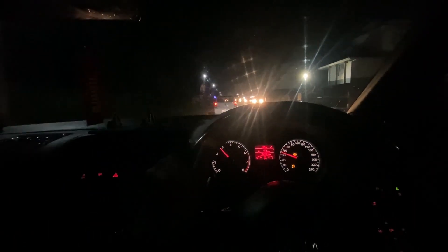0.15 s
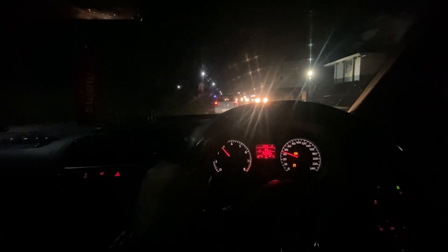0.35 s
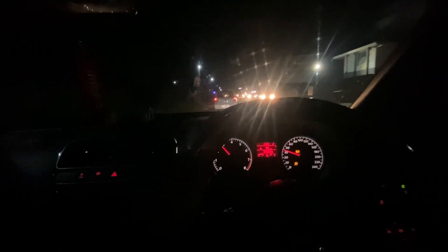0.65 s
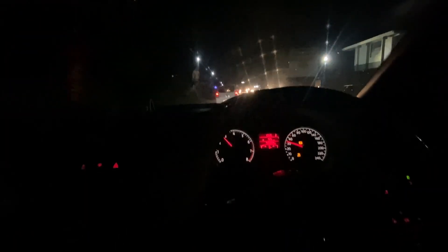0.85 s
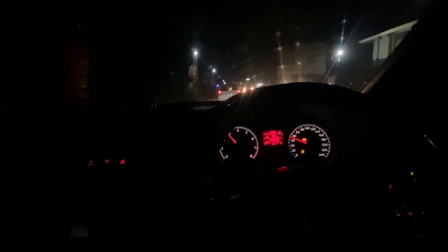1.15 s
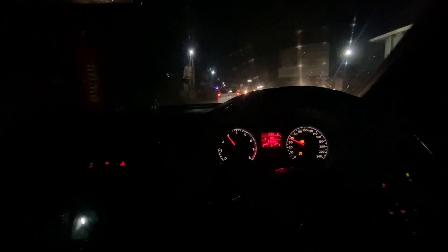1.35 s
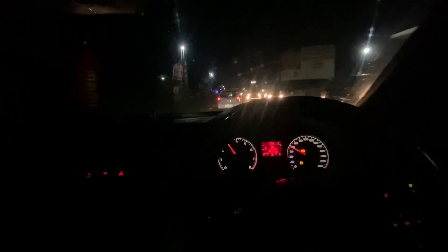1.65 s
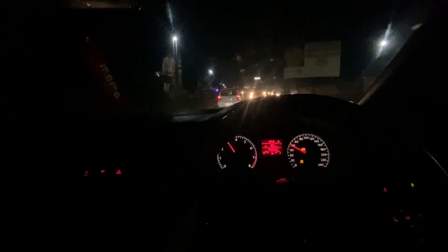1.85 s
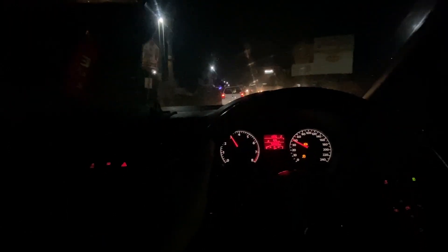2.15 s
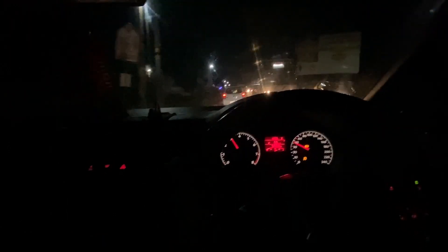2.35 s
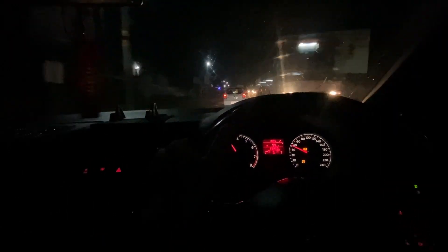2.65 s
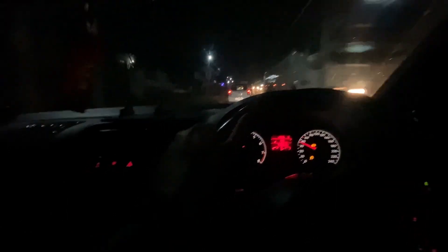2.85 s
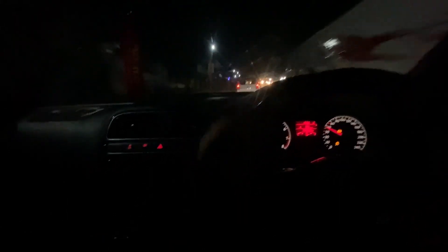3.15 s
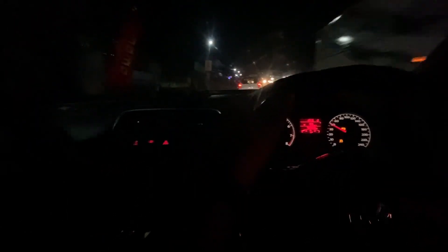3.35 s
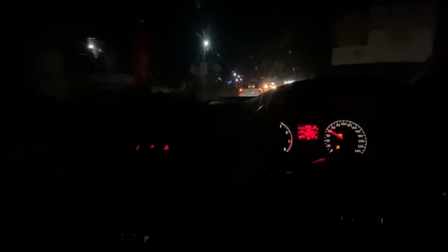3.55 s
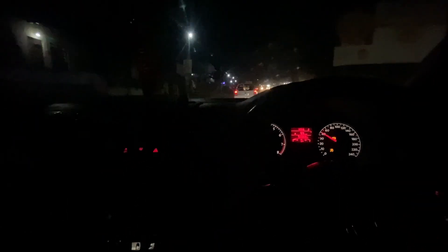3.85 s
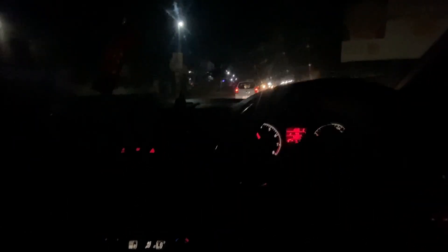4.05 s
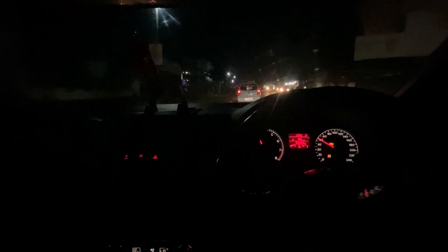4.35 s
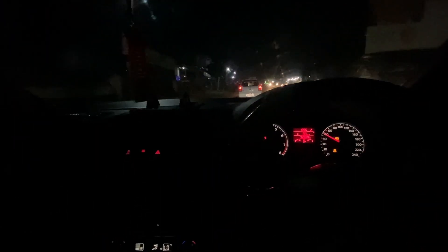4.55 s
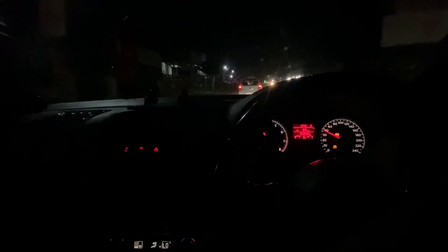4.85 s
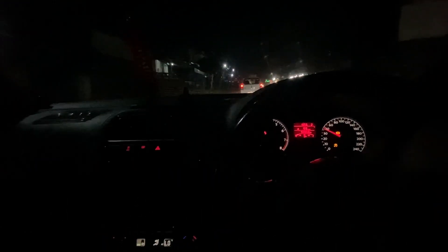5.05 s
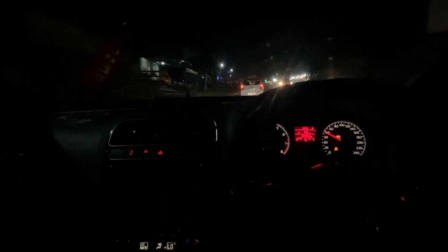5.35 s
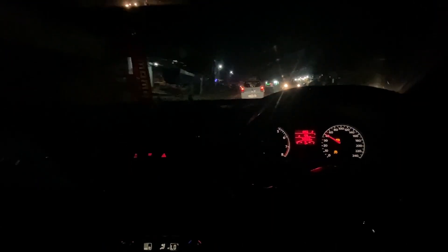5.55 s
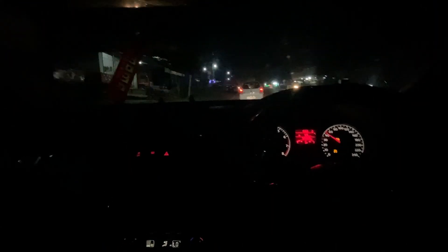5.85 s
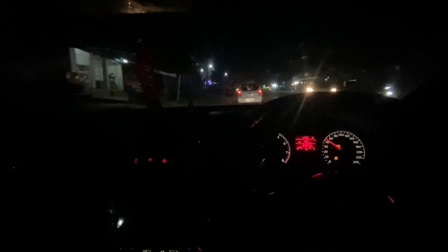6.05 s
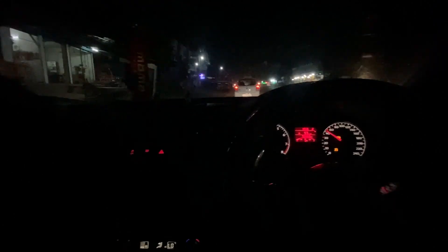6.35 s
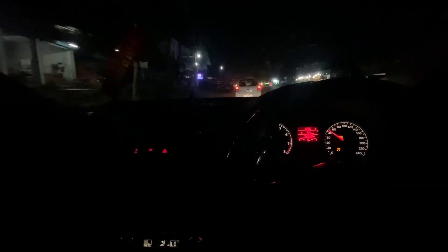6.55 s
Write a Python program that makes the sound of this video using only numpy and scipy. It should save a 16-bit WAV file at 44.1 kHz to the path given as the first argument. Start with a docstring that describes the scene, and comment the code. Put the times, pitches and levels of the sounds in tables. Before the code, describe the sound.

A turbocharged car engine booms and eases off over tyre rumble, heard inside the cabin, with three short hisses of venting air.

```python
"""Exhaust boom over tyre rumble: a turbocharged four-cylinder car at town speed, from the driver's seat. Firing
pulses boom through the cabin and growl under load; a soft hiss fades in the first second. Low shudders thump as
the car coasts after each lift, and plastic trim clicks. Three times boost builds with a rush of intake air,
then the throttle shuts and the blow-off valve vents a hissing jet."""
import sys
import numpy as np
from scipy import signal
from scipy.fft import rfft, irfft
from scipy.io import wavfile

SR = 44100
rng = np.random.default_rng(int(sys.argv[2]) if len(sys.argv) > 2 else 0)


def dump(signal):
    """Clip the signal to [-1, 1] and save it as 16-bit WAV at the path in sys.argv[1]."""
    limited = np.clip(np.atleast_2d(signal).T, -1, 1)
    pcm = np.round(limited * 32767).astype(np.int16)
    wavfile.write(sys.argv[1], SR, pcm)


N = 295136
TIME_S = np.arange(N) / SR
FREQ_HZ = np.fft.rfftfreq(N, 1 / SR)

# firing rate before sags: t/s, f/Hz
FIRING_RATE = [(0, 92.02), (0.97, 93.5), (1.38, 105.1), (1.8, 103.5), (2.578, 98.72), (3.334, 109.8),
               (3.84, 109), (4.2, 102.6), (4.442, 104), (4.685, 101.2), (5.443, 111.9), (5.7, 118.2),
               (6.22, 118.7), (6.408, 117.9), (6.579, 112.9), (6.69, 115.4)]
# engine pulls, coasting between: start/s, end/s, initial load/dB
PULLS = [(-0.5, 0.31, -22), (0.681, 1.732, -15), (2.816, 3.69, -9.5), (4.919, 6.04, -7)]
# pedal prods: peak/s, rise/s, boom/dB, load/dB, turbo air/dB, firing rate sag/Hz
PRODS = [(0.95, 0.036, -30, -22, -29, 0.26), (1.409, 0.077, -17, -1.5, -6, 7.57),
         (2.928, 0.027, -27.5, -24, -32, 4.7), (3.37, 0.035, -14, 6, 0, 6.4),
         (5.042, 0.039, -23, -10, -22.5, 3), (5.511, 0.067, -33, 2.5, -12, 0.11),
         (5.759, 0.018, -19, 8, 0, 4.6)]
# exhaust drone late in each coast: start/s, end/s, boom/dB, rasp/dB
DRONES = [(2.257, 2.699, -20.5, -6), (4.177, 4.793, -17, 1), (6.456, 7.0, -21, -0.5)]
# firing harmonics in the cabin at 0 dB load: f/Hz, level/dB
LOADED_HARMONICS = [(180, -27), (210, -27), (240, -35.5), (280, -37.5), (300, -26.5), (318, -37),
                    (345, -50), (380, -36.5), (410, -42.5), (450, -36), (505, -35.5), (560, -49),
                    (620, -48), (720, -48.5), (840, -49)]
# firing harmonics off throttle: f/Hz, level/dB
OVERRUN_HARMONICS = [(200, -30.5), (225, -38.5), (310, -38), (345, -38), (410, -43), (520, -46),
                     (630, -43.5), (730, -47), (820, -55)]
# upper engine orders in the cabin: f/Hz, level/dB
GROWL_SPECTRUM = [(250, -45), (350, -53.5), (450, -39.5), (530, -43), (610, -47.5), (700, -58),
                  (830, -49.5), (1000, -64.5), (1600, -59.5)]
# tyre noise: t/s, rumble/dB, hiss/dB
ROAD_LEVELS = [(0, -32, -57), (.6, -34, -60), (1.2, -30, -56), (2.0, -31, -57), (2.8, -30, -55),
               (3.6, -28.5, -51), (4.4, -28, -53), (5.0, -29, -52), (5.6, -25, -49.5), (6.69, -28, -48.5)]
# shudders as the car coasts after each lift: t/s, Gaussian half length/s, level/dB
SHUDDERS = [(0.384, 0.091, -29), (2.152, 0.043, -22.5), (2.311, 0.065, -20.5), (2.637, 0.043, -28),
            (4.22, 0.062, -20), (4.298, 0.013, -20.5), (4.767, 0.021, -26.5), (6.52, 0.037, -18.5),
            (6.648, 0.053, -20.5)]
# opening hiss: t/s, level/dB
SOFT_HISS_LEVELS = [(0, -47.5), (.12, -54.5), (.28, -55.5), (.4, -61.5), (.55, -72), (.9, -100)]
# noise shapes: f/Hz, relative density/dB
RUMBLE_SPECTRUM = [(15, -44.5), (29, -34), (39, 6.5), (50, 11), (75, 3), (130, 6.5), (190, -8), (280, -8),
                   (420, -8), (560, -14), (730, -37.5), (900, -17.5), (1100, -36), (2000, -57)]
TYRE_HISS_SPECTRUM = [(400, -8.5), (900, 3), (1300, 2), (2000, -1), (3000, -6), (4000, -8), (5000, -14),
                      (6700, -16.5), (7500, -25.5), (10000, -39), (12000, -57.5), (16000, -35.5)]
THUD_SPECTRUM = [(28, -37.5), (48, 0.5), (80, 4.5), (145, 11), (190, -9.5), (300, -21), (480, -22),
                 (655, -19.5), (790, -29), (1300, -40.5), (2500, -49), (6000, -90)]
SOFT_HISS_SPECTRUM = [(600, -23), (1500, -8), (2500, 0), (3800, 1), (4700, -6.5), (5500, -0.5),
                      (7600, -13.5), (8400, -6), (10000, -17), (13000, -26), (16000, -20)]
SNAP_SPECTRUM = [(300, -3.5), (900, -5), (2000, -13.5), (4000, -18), (6000, -21), (7300, -28),
                 (10000, -28.5), (16000, -45.5)]
INTAKE_SPECTRUM = [(200, -2.5), (450, 3.5), (820, 11), (1100, -8.5), (1700, -1), (2500, -8), (3100, -15),
                   (5000, -21), (7400, -24.5), (9500, -21.5), (12000, -38.5), (16000, -30.5)]
JET_SPECTRUM = [(400, -29.5), (1000, 3), (1500, -3.5), (2500, 2.5), (3700, 2.5), (4700, 0.5), (5700, 1.5),
                (7600, -5.5), (8500, 0.5), (10200, -6.5), (11300, -7), (12300, -15), (13200, -9),
                (14600, -8.5), (16000, -11)]
# trim and switch clicks: t/s, level/dB, tilt/(dB/octave)
CLICKS = [(0.76, -43, 0), (1.137, -51, 10), (1.148, -50.5, 4), (2.132, -45, -5), (2.288, -37.5, -5.5),
          (2.335, -31, -8), (4.297, -25.5, -8.5), (4.6268, -33, 1), (5.1165, -18, -2.5),
          (5.1215, -20.5, -2), (5.206, -26, -6), (5.217, -41, 2), (5.578, -48.5, 4), (6.4268, -42, 2.5)]
# plastic modes: f/Hz, level/dB, t60/s
PLASTIC_MODES = [(370, 5, 0.035), (490, 6.5, 0.022), (520, 7.5, 0.024), (790, 5, 0.047), (1100, -7, 0.18),
                 (1217, -10, 0.19), (1540, -11.5, 0.15), (1987, -8.5, 0.031), (2470, -10, 0.027),
                 (3300, -19, 0.033), (4790, -14.5, 0.073), (5850, -10.5, 0.041)]
# valve vents: t/s, level/dB, opening/s, hold/s, t60/s, edge tone f/Hz, edge tone re jet/dB
VENTS = [(1.499, -44, 0.024, 0.09, 1, 3780, -9.5), (3.475, -39, 0.03, 0.045, 1, 6040, -12),
         (5.825, -33, 0.031, 0.017, 1, 6260, -8)]
# cabin resonances and dead spots: f/Hz, width/Hz, gain/dB
CABIN_MODES = [(169.4, 27, 4), (294, 8, 8), (677, 16, 10.5), (727, 86, -4), (905, 38, 7.5), (946, 120, -7),
               (1155, 230, 4.5), (1840, 79, -9.5), (3000, 100, -3), (3880, 17, 12), (4520, 270, 0)]
# left-right likeness: f/Hz, coherence (clipped to +-1 in use)
COHERENCE = [(30, 4.5), (180, 0.38), (350, 3.7), (600, 0.3), (900, 0), (16000, 0)]
# channel balance: f/Hz, left minus right/dB
BALANCE = [(30, -8.5), (100, -5), (200, -7.5), (350, -1.5), (650, 2), (1400, 0.5), (2600, -1), (5000, 4),
           (7000, 1), (9000, -3.5), (12000, 0)]


def amp(db):
    return 10 ** (np.asarray(db) / 20)


def unit_rms(x):
    return x / np.sqrt(np.mean(x ** 2) + 1e-20)


def lookup(points, hz):
    """Interpolate on a log-frequency axis."""
    f_hz, value = np.transpose(points)
    return np.interp(np.log(hz + 1), np.log(f_hz), value)


def curves(rows):
    """Time table columns at every sample."""
    t_s, *columns = np.transpose(rows)
    return [np.interp(TIME_S, t_s, column) for column in columns]


def drift(rate_hz):
    """Low-passed noise, rms 1."""
    return unit_rms(irfft(rfft(rng.standard_normal(N)) * np.exp(-(FREQ_HZ / rate_hz) ** 2), N))


def noise(spectrum):
    """Stereo noise, rms 1: mostly shared in the bass, diffuse above."""
    left, other = rfft(rng.standard_normal((2, N)))
    shared = np.clip(lookup(COHERENCE, FREQ_HZ), -1, 1)
    right = shared * left + np.sqrt(1 - shared ** 2) * other
    return unit_rms(irfft(np.array([left, right]) * amp(lookup(spectrum, FREQ_HZ)), N))


def swell(peak_s, rise_s, hold_s, fall_db_per_s):
    """Gaussian rise, hold, exponential fall."""
    t = TIME_S - peak_s
    return np.exp(-.5 * (np.minimum(t, 0) / rise_s) ** 2) * amp(-fall_db_per_s * np.maximum(t - hold_s, 0))


def gate(start_s, end_s, release_s, attack_s=0.14):
    return np.clip((TIME_S - start_s) / attack_s, 0, 1) * np.clip((end_s - TIME_S) / release_s, 0, 1)


def soft_gate(start_s, end_s, ease_s):
    return (np.tanh((TIME_S - start_s) / ease_s) - np.tanh((TIME_S - end_s) / ease_s)) / 2


def firings(sag_delay_s=.117, sag_in_s=.064, sag_out_s=.103):
    """Firing rate, sagging after each prod, and running firing count."""
    hz = curves(FIRING_RATE)[0]
    for peak_s, *_, sag_hz in PRODS:
        t = TIME_S - peak_s - sag_delay_s
        hz = hz - sag_hz * np.exp(-.5 * (t / np.where(t < 0, sag_in_s, sag_out_s)) ** 2)
    return hz, np.cumsum(hz * (1 + 0.0017 * drift(19))) / SR


def effort(firing_hz, reference_hz=100, creep_db_per_s=5, lift_lead_s=0.093):
    """Gains of boom, load, overrun rasp and turbo air. The boom changes sign with the torque."""
    pulling = sum(soft_gate(start_s, end_s, ease_s=0.056) for start_s, end_s, _ in PULLS)
    excess_hz = firing_hz - reference_hz
    boom = amp(-25.5 + 0.8212 * excess_hz)  # grows towards a cabin resonance
    load = sum(amp(db + creep_db_per_s * (TIME_S - start_s))
               * soft_gate(start_s, end_s - lift_lead_s, ease_s=0.1) for start_s, end_s, db in PULLS)
    rasp = amp(-19) * (1 - pulling)
    air = (amp(-28) + amp(-24) * pulling) * amp(0.7082 * excess_hz)
    for peak_s, rise_s, boom_db, load_db, air_db, _ in PRODS:
        boom += amp(boom_db) * pulling * swell(peak_s, rise_s, hold_s=0.13, fall_db_per_s=75.5)
        load += amp(load_db) * swell(peak_s, rise_s, hold_s=0.029, fall_db_per_s=59)
        air += amp(air_db) * swell(peak_s, rise_s=.025, hold_s=0.072, fall_db_per_s=108.5)
    for start_s, end_s, boom_db, rasp_db in DRONES:
        boom += amp(boom_db) * gate(start_s, end_s, release_s=0.12)
        rasp += amp(rasp_db) * gate(start_s, end_s, release_s=0.31)
    return boom * (2 * pulling - 1), load, rasp, air


def exhaust(firing_hz, cycles, boom, load, rasp, left_lead_rad=0.31, waver_db=-0.27, flutter_db=2.13):
    """Boom at the firing rate plus harmonics; the low ones follow the load most."""
    gains = [boom * amp(waver_db * drift(5.5))]
    for k in range(2, 8):
        loaded = amp(lookup(LOADED_HARMONICS, k * firing_hz)) * load ** (0.9 - 0.055 * k)
        overrun = amp(lookup(OVERRUN_HARMONICS, k * firing_hz)) * rasp
        gains.append((loaded + overrun) * amp(flutter_db * drift(7.6)))
    phase = 2 * np.pi * cycles + np.array([[left_lead_rad], [0]])
    return np.sqrt(2) * sum(gain * np.cos(k * phase + 2 * np.pi * rng.random())
                            for k, gain in enumerate(gains, 1))


def growl(firing_hz, cycles, load, rasp, uneven_db=-6, bite_per_order=0.032):
    """High orders rise with load and rasp; unequal cylinders add weaker half orders."""
    strain_db = 20 * np.log10(amp(-21.5) + load + amp(-2) * rasp)
    out = np.zeros((2, N))
    for order in np.r_[2.5:7, 7:14:.5]:
        spread_rad = np.arccos(np.clip(lookup(COHERENCE, order * firing_hz.mean()), -1, 1))
        jitter_rad, flutter = .3 * drift(15), 1 + .3 * drift(15)
        phase = 2 * np.pi * (order * cycles + rng.random()) + jitter_rad - np.array([[spread_rad], [0]])
        db = lookup(GROWL_SPECTRUM, order * firing_hz) + uneven_db * (order % 1 > 0)
        db += strain_db * (1 + bite_per_order * order)
        out += amp(db) * flutter * np.cos(phase)
    return out


def road(cycles, throb_depth=0.06, lumpy_db=0.5, flicker_db=1.1):
    """Tyres rumble and hiss; low shudders thump as the car coasts after each lift."""
    rumble_db, hiss_db = curves(ROAD_LEVELS)
    rumble = noise(RUMBLE_SPECTRUM) * amp(rumble_db + lumpy_db * drift(10))
    hiss = noise(TYRE_HISS_SPECTRUM) * amp(hiss_db + flicker_db * drift(27))
    throb = 1 + throb_depth * np.cos(2 * np.pi * cycles)
    jolts = sum(amp(db) * np.exp(-.5 * ((TIME_S - at_s) / half_s) ** 2) for at_s, half_s, db in SHUDDERS)
    return rumble + hiss * throb + noise(THUD_SPECTRUM) * jolts


def soft_hiss():
    """Weak air hiss, dying away."""
    return noise(SOFT_HISS_SPECTRUM) * amp(curves(SOFT_HISS_LEVELS)[0])


def trim_clicks(snap_t60_s=.03, tail_t60_s=.14, tail_db=-17, ring_db=-9, attack_s=0.00051):
    """Plastic parts knock: sharp snap, brief ring, short cabin tail."""
    out, t = np.zeros((2, N)), TIME_S[:SR // 5]
    n = len(t)
    hz = np.fft.rfftfreq(n, 1 / SR)
    decay = amp(-60 * t / snap_t60_s) + amp(tail_db - 60 * t / tail_t60_s)
    for at_s, db, tilt_db_per_octave in CLICKS:
        snap = unit_rms(irfft(rfft(rng.standard_normal((2, n))) * amp(lookup(SNAP_SPECTRUM, hz)), n))
        ring = sum(amp(mode_db - 60 * t / t60_s)
                   * np.sin(2 * np.pi * (mode_hz * t + rng.random() + 0.21 * rng.random((2, 1))))
                   for mode_hz, mode_db, t60_s in PLASTIC_MODES)
        tilt = amp(tilt_db_per_octave * np.log2(np.clip(hz, 300, 7000) / 1000))
        knock = irfft(rfft(snap * decay + amp(ring_db) * ring) * tilt, n)
        knock *= np.minimum(t / attack_s, 1) * (1 - t / t[-1])
        knock *= amp(db) / np.std(knock[:, :SR // 200])  # level over the first 5 ms
        slot = out[:, round(at_s * SR):][:, :n]
        slot += knock[:, :slot.shape[1]]
    return out


def intake(cycles, air, level_db=-36):
    """Air rushes through the compressor, pulsing with each intake stroke."""
    pulsing = (1 + .3 * np.cos(2 * np.pi * cycles)) * amp(1.2 * drift(40))
    return noise(INTAKE_SPECTRUM) * pulsing * amp(level_db) * air


def blow_off(whoosh_hz=1900, fizz_hz=7000, tone_width_hz=22, flicker_db=0.36):
    """The valve snaps open; as the pipe empties the jet loses whoosh and fizz, narrowing to a hiss."""
    jet = rfft(noise(JET_SPECTRUM))
    low = 1 / (1 + (FREQ_HZ / whoosh_hz) ** 4)
    high = 1 / (1 + (fizz_hz / (FREQ_HZ + 1)) ** 4)
    whoosh, body, fizz = (irfft(jet * band, N) for band in (low, 1 - high - low, high))
    out = np.zeros((2, N))
    for at_s, db, opening_s, hold_s, t60_s, tone_hz, tone_db in VENTS:
        t = TIME_S - at_s
        pressure = amp(-60 * (np.maximum(t - hold_s, 0) / t60_s) ** 1.22)  # faster as the valve shuts
        flow = amp(db) * np.clip(t / opening_s, 0, 1) * pressure
        tone_band = 1 / (1 + ((FREQ_HZ - tone_hz) / tone_width_hz) ** 2)
        edge_tone = unit_rms(irfft(rfft(rng.standard_normal(N)) * tone_band, N))
        whistle = amp(tone_db) * pressure * edge_tone * np.array([[1], [.3]])  # only a hard jet whistles
        out += flow * (whoosh * pressure ** 0.46 + body + fizz * pressure ** 0.45 + whistle)
    return out * amp(flicker_db * drift(60))


def cabin(x):
    """Cabin modes lift some bands and hollow out others."""
    db = sum(gain_db * np.exp(-np.log(2) * (2 * (FREQ_HZ - hz) / width_hz) ** 2)
             for hz, width_hz, gain_db in CABIN_MODES)
    return irfft(rfft(x) * amp(db), N)


def scene():
    """Engine, road, trim and turbo in stereo."""
    firing_hz, cycles = firings()
    boom, load, rasp, air = effort(firing_hz)
    body = cabin(growl(firing_hz, cycles, load, rasp) + intake(cycles, air) + road(cycles))
    return exhaust(firing_hz, cycles, boom, load, rasp) + body + trim_clicks() + blow_off() + soft_hiss()


def record(dry, cutoff_hz=15750):
    """Left-right balance by frequency, then low-pass."""
    lean = amp(lookup(BALANCE, FREQ_HZ))
    gains = np.array([lean, np.ones_like(lean)]) * 2 / (1 + lean)
    balanced = irfft(rfft(dry) * gains, N)
    lowpass = signal.firwin(511, cutoff_hz, window=("kaiser", 9), fs=SR)
    return signal.oaconvolve(balanced, lowpass[None], "same")


dry = scene()
out = record(dry)
dump(out)
```